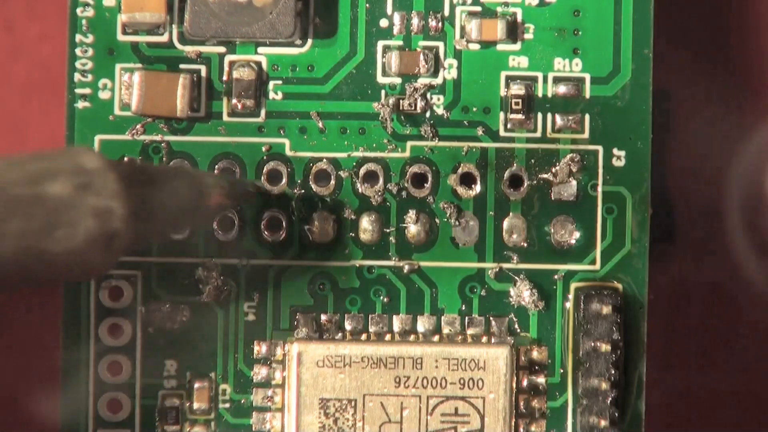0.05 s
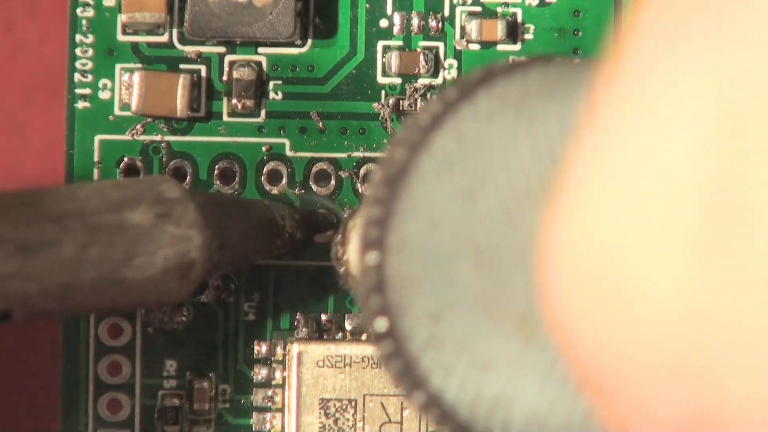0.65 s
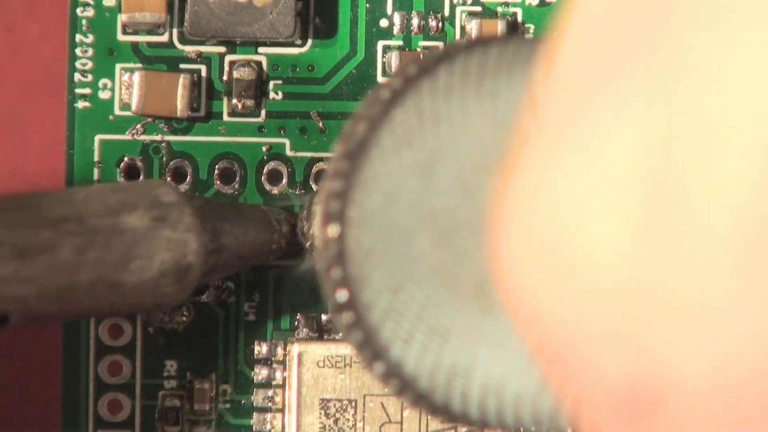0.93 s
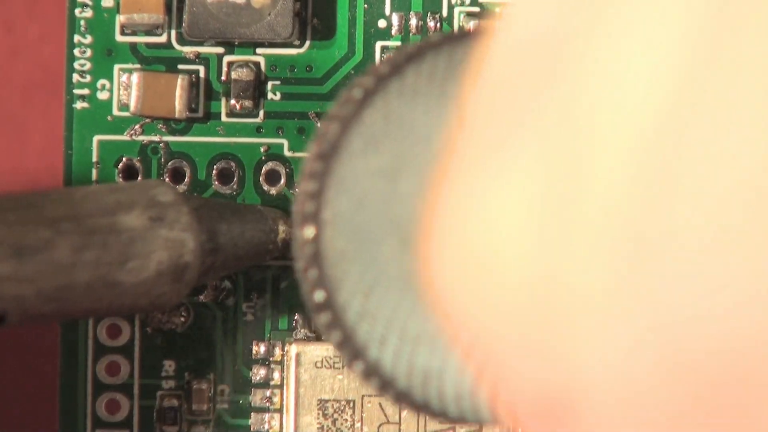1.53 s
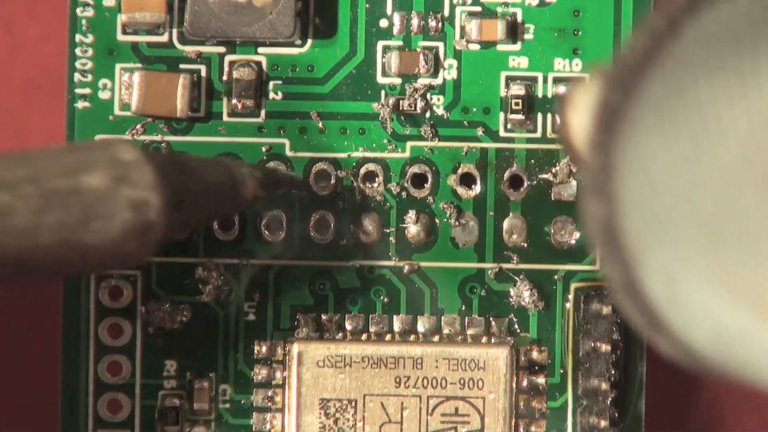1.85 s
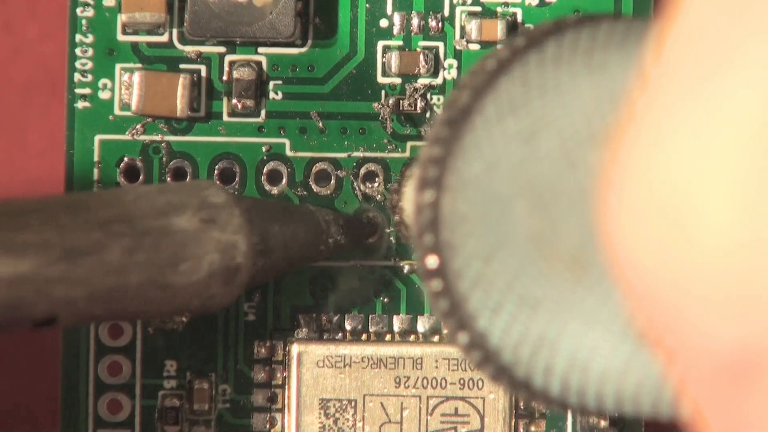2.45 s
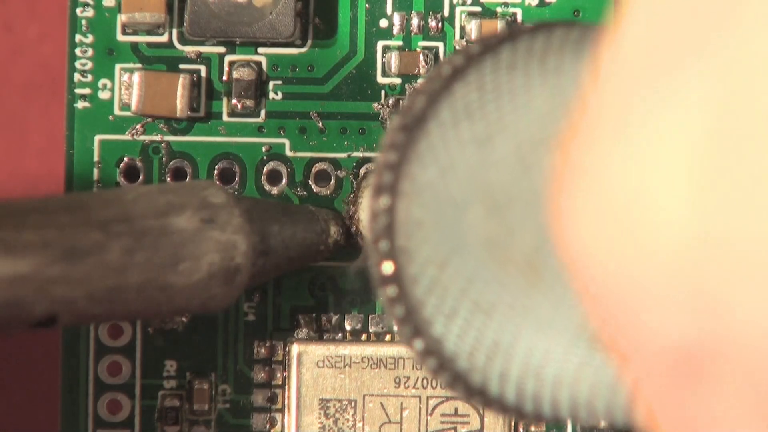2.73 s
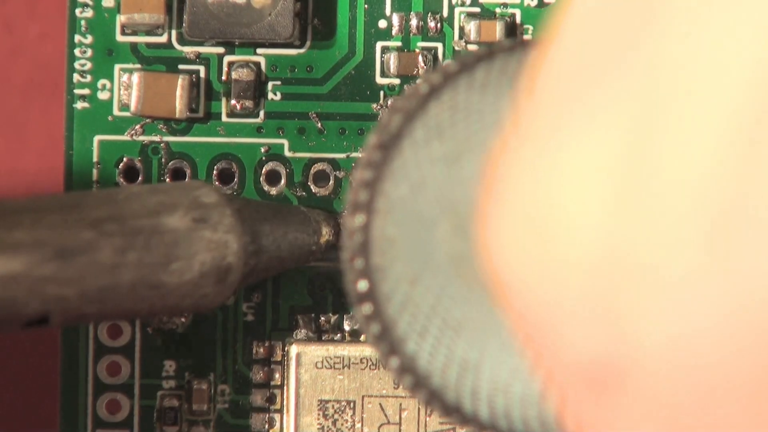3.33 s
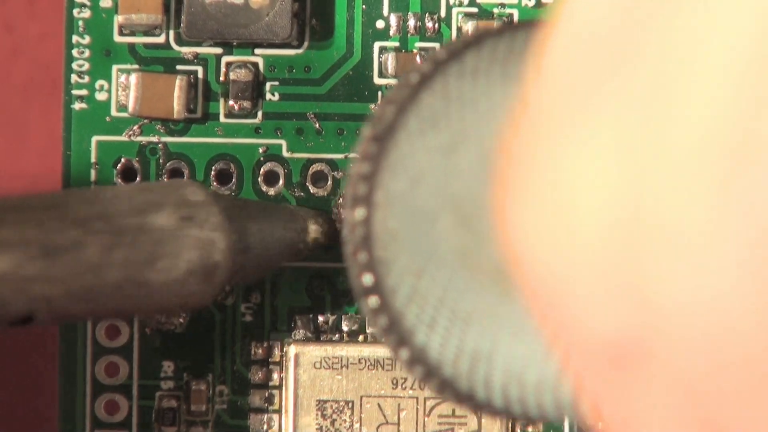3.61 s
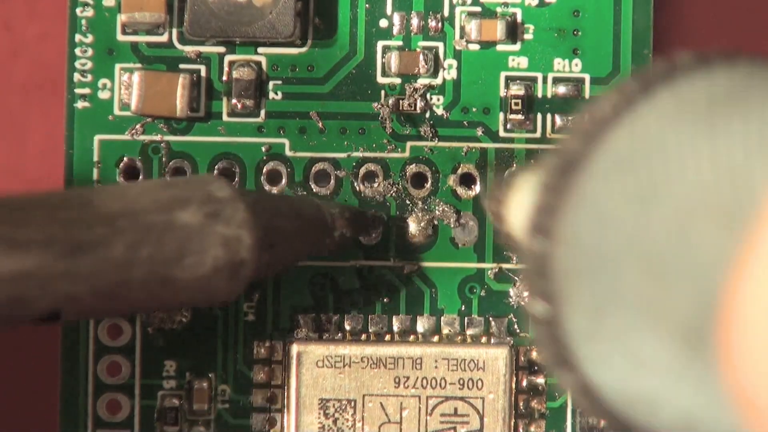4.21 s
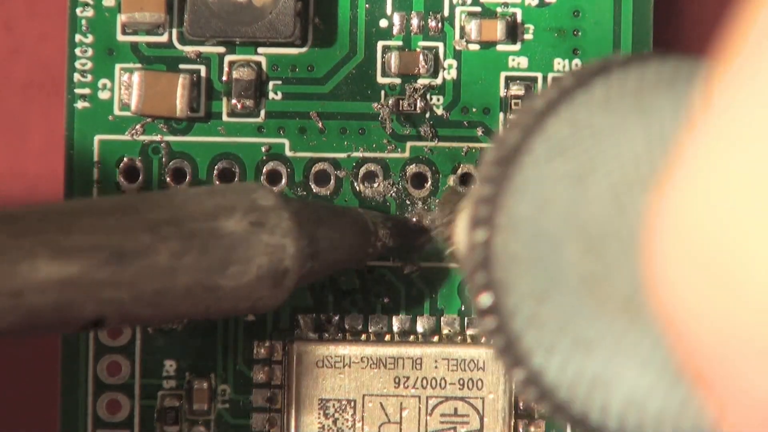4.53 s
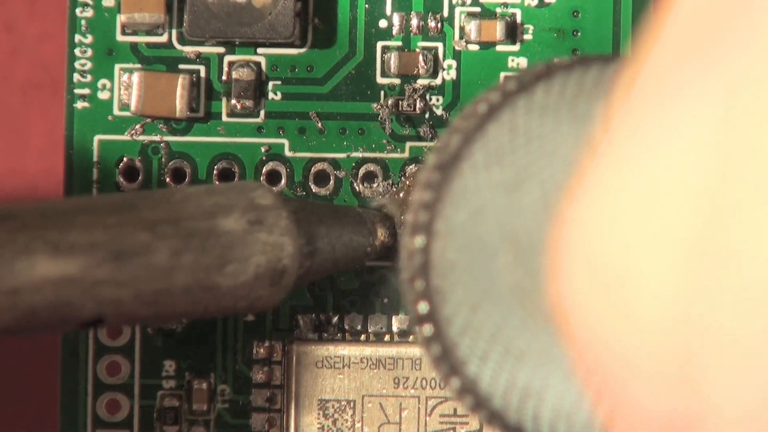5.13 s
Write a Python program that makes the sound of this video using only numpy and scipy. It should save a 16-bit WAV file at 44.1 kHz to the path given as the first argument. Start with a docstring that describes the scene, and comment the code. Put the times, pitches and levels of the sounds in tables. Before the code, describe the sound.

Close squeaks and latching clacks of a desoldering pump being cocked alternate with two loud snaps, with light circuit board taps and steady hum.

```python
"""At a workbench, over mains hum, a spring-loaded desoldering pump is worked close to the microphone.
As it is cocked, the piston seal squeals by stick-slip friction, the catch latches and the rod springs back.
Fired, the piston slams home with a gulp of air and the recoil thumps the bench. Each impact is an impulse
filtered by the body it strikes. The nozzle taps and scrapes a circuit board; faint ticks come in runs."""
import sys
import numpy as np
from scipy import signal
from scipy.fft import rfft, irfft
from scipy.io import wavfile
from scipy.ndimage import uniform_filter1d

SR = 44100
rng = np.random.default_rng(int(sys.argv[2]) if len(sys.argv) > 2 else 0)


def master(y):
    """Save y as 16-bit WAV."""
    cut = np.clip(np.atleast_2d(y).T, -1, 1)
    pcm = np.round(cut * 32767)  # scale
    wavfile.write(sys.argv[1], SR, pcm.astype(np.int16))


N = 236743
T = np.arange(N) / SR
MAINS_HZ = 50.06

# Spectral envelopes. Each row: frequency in Hz, relative level in dB.
HISS_COLOUR = [(150, -14), (300, -7), (550, -8.5), (900, -10), (1400, -12), (1900, -10.5), (2600, -14.5),
               (5000, -19), (10000, -24), (12000, -21)]
RUMBLE_COLOUR = [(20, 9.5), (45, -39), (70, -4), (125, 5.5), (200, 5.5), (300, 7), (500, -7), (900, -7),
                 (2500, -66)]
SLIDE_COLOUR = [(500, -7.5), (1400, -3), (2400, -1.5), (3600, 3.5), (4700, -9.5), (6000, -2.5), (7800, -7),
                (10500, -13.5), (15000, -26)]
RASP_COLOUR = [(900, -24), (2500, -10.5), (3600, 6.5), (4700, 0.5), (5900, 8), (7500, -3), (10000, -11.5),
               (15000, -23)]
CATCH_COLOUR = [(120, -55), (400, -33), (900, -45), (1700, -35), (2150, -12), (2650, -1), (3200, -5),
                (3800, 1), (4250, -2.5), (5000, -2.5), (5700, -16), (7700, -7), (9300, -14.5), (12000, -18),
                (15000, -36)]
TICK_COLOUR = [(1500, 4), (4000, 2.5), (6000, 3.5), (9000, 5), (12500, 0.5), (15000, -5)]
BUTTON_COLOUR = [(500, -27), (1400, -13), (2400, -4), (3100, -3.5), (3800, -6), (4300, -2.5), (5050, 4),
                 (5700, -1.5), (7000, -11), (10000, -18.5), (15000, -21)]
ROD_COLOUR = [(200, -24), (400, -17), (1000, -22), (1700, -19), (2600, -9), (3700, -5), (4900, -6),
              (5900, -1), (7100, -4.5), (8000, -10), (9200, -10), (10700, -21.5), (13500, -17),
              (15000, -30)]
TAP_COLOUR = [(150, -35), (500, -16), (1100, -8.5), (1350, -13), (1600, -3), (1950, -10.5), (2300, 3.5),
              (2600, 3.5), (2900, -5), (3300, -6), (4200, -18), (6200, -23), (8700, -13), (11000, -26),
              (12300, -15), (14000, -46)]
SLAM_COLOUR = [(120, -104.5), (200, -14.5), (338, -2.5), (624, -14), (1070, -6.5), (1510, -12.5),
               (1720, -10.5), (2130, -13), (2290, -7), (2550, -3), (3350, -7), (5070, 2), (9050, -6),
               (12300, -5.5), (15000, -12)]
WALL_COLOUR = [(100, -17), (400, 0), (1200, 7), (3000, 6.5), (7000, 3.5), (15000, 7.5)]

# Normal modes. Each row: frequency in Hz, bandwidth in Hz, relative level in dB.
BARREL_MODES = [(2590, 80, -2), (2950, 100, -5), (3770, 90, 1), (4350, 160, -7), (4980, 170, -7),
                (5260, 130, -6), (5750, 180, -9), (6980, 140, -3), (12200, 400, -6)]
BENCH_MODES = [(126, 3.8, 5), (140.6, 3.3, -7), (310, 27, -4), (391, 18, 3.5), (497, 32, 1.5),
               (747, 260, -2)]
BOARD_MODES = [(440, 70, -5), (694, 70, -5), (1030, 70, -1), (1310, 150, -2), (2250, 150, -2),
               (2850, 300, -9), (4620, 500, -15), (10500, 1600, -23)]
CREAK_MODES = [(424, 200, 0)]

# Harmonic series. Each row: harmonic number, level in dB.
HUM_HARMONICS = [(1, -62), (2, -49.5), (3, -45), (4, -61), (5, -60), (6, -49), (7, -67), (8, -65),
                 (9, -65.5), (10, -64.5), (11, -62), (13, -70.5), (14, -63.5), (16, -68.5), (22, -69.5)]
SEAL_OVERTONES = [(2, -3), (3, -2), (4, -26), (5, -23), (6, -13), (7, -11)]

# Cocking strokes. Each row: squeal start and length in seconds, pitch in Hz, levels of squeal, overtones
# and rasp in dB, chirp length in seconds, its level in dB, slide hold in seconds, its level in dB.
STROKES = [(0.044, 0.0299, 1131, -18.5, -9.5, -5.5, .008, -32, 0.14, -35),
           (1.942, 0.015, 1090, -25, -6, -9.5, .02, -38, 0.16, -34),
           (3.971, 0.028, 1065, -21.5, -4, -18, 0.011, -39, 0.15, -33)]
# The two harder strokes jump to a higher register, one path each.
# Each row of a path: time in seconds, pitch in Hz, relative level in dB.
HIGH_SQUEALS = [
    [(0.072, 1544, -16.5), (0.084, 1458, -24), (0.118, 1450, -40)],
    [(3.998, 1394, -17), (4.01, 1363, -24.5), (4.028, 1443, -34), (4.034, 1380, -34), (4.044, 1512, -32),
     (4.068, 1680, -23.5), (4.084, 1693, -28.5)],
]

# Events. Each row: start in seconds, relative level in dB.
CATCH_GRAZES = [(.1355, -24), (0.1422, -18), (0.155, -19.5), (.1625, -24), (.18, -26), (2.0265, -19)]
CATCH_LATCHES = [(2.0386, 1), (4.0867, -2)]
TICK_RUNS = [(0.2536, -47.5), (1.5917, -47.5), (2.9306, -47), (4.349, -48.5)]
BUTTON_PRESSES = [(.259, -26), (1.4157, -25.5), (3.476, -17.5)]
BUTTON_RELEASES = [(1.5888, -15), (3.6404, -16.5)]
ROD_RETURNS = [(.3013, -1), (2.1758, -2), (4.2358, -0.5)]
BOARD_CREAKS = [(3.165, -14.5)]
# The pump fires. Each row: start in seconds, relative level in dB, hardness as a factor on the cut-off.
SHOTS = [(1.44, 0, 1.12), (3.4971, 0.5, 0.78)]

# Contacts within one event.
# Each row: delay in seconds, relative level in dB, chatter T60 in seconds, nominal cut-off in Hz.
LATCH_CONTACTS = [(0, -1, 0.0071, 16500), (.0013, -5, 0.053, 15400), (0.029, -13, .055, 9000)]
RELEASE_CONTACTS = [(0, 0.5, 0.021, 15000), (.0085, 2, 0.012, 9600)]
ROD_CONTACTS = [(0, -3.5, .045, 10500), (.0067, -1.5, .016, 12500), (.0087, -7, .028, 18000)]
SLAM_CONTACTS = [(0, 1, .01, 7800), (.0065, -3.5, 0.016, 16500), (.009, -6, .035, 16500),
                 (.021, -10, .016, 9000)]
# Pushes on the bench. Each row: delay in seconds, relative level in dB, duration in seconds.
SHOT_RECOIL = [(.0115, -8, 0.0015), (0.0174, 4.5, 0.0041), (.052, -9, .0052)]
ROD_RECOIL = [(0.0111, -19.5, 0.00087)]

# The nozzle strikes the board. Each row: start in seconds, relative level in dB, cut-off in Hz.
TAPS = [(.508, -32.5, 6000), (0.8111, -15, 16000), (1.4641, -7, 6000), (3.528, -13.5, 8920),
        (3.537, -23, 8850), (4.4375, -32, 6030)]
# It is dragged. Each row: peak time in seconds, level in dB, then attack, hold and release in seconds.
SCRAPES = [(3.168, -44, 0.028, 0.078, 0.19), (4.632, -54.5, 0.31, 0.38, 1)]


def undb(db):
    """Amplitude ratio of a level in decibels."""
    return 10 ** (np.asarray(db) / 20)


def unit(x):
    """Normalisation to an rms of 1."""
    return x / np.sqrt(np.mean(x ** 2))


def add(out, s, x):
    """Superposition: x joins out at s seconds."""
    i = int(s * SR)
    out[i:i + len(x)] += x[:N - i]


def convolve(x, response):
    """A linear system convolves its input with its impulse response."""
    return signal.fftconvolve(x, response)[:N]


def colour(points, size=2048):
    """Minimum-phase impulse response of unit energy, found from a spectral envelope by its cepstrum."""
    hz, db = np.transpose(points)
    bins_hz = np.maximum(np.arange(size // 2 + 1) * SR / size, 1)
    magnitude = undb(np.interp(np.log(bins_hz), np.log(hz), db))
    cepstrum = irfft(np.log(magnitude))
    cepstrum[1:size // 2] *= 2
    cepstrum[size // 2 + 1:] = 0
    response = irfft(np.exp(rfft(cepstrum)))
    return response / np.linalg.norm(response)


def ring(modes):
    """Modal superposition: damped sinusoids sum to an impulse response, scaled to unit energy."""
    t = T[:SR // 2]
    response = sum(undb(db) * width * np.exp(-np.pi * width * t) * np.sin(2 * np.pi * hz * t)
                   for hz, width, db in modes)
    return response / np.linalg.norm(response)


def grit(spread_db, slip_samples=24):
    """Friction noise: its strength jumps from one tiny slip to the next."""
    slips = np.repeat(rng.standard_normal(N // slip_samples + 1), slip_samples)[:N]
    return unit(undb(spread_db * slips) * rng.standard_normal(N))


def swell(s, db, attack_s, hold_s, sag_db, release_s, depth_db=28):
    """Piecewise exponential envelope: it peaks at s seconds, sags while held, then dies away."""
    times = s + np.array([-attack_s, 0, hold_s, hold_s + release_s])
    levels = db - np.array([depth_db, 0, sag_db, sag_db + depth_db])
    return undb(np.interp(T, times, levels, left=-np.inf, right=-np.inf))


def each(events, pattern):
    """A pattern of contacts repeats at every event; delays and decibels add."""
    return [(s + delay, db + part_db, *rest) for s, db, *_ in events for delay, part_db, *rest in pattern]


def knocks(contacts, envelope, chatter_db, gain_db=10.5, size=4096):
    """Impact excitation: an impulse and decaying chatter, low-passed more by a softer contact."""
    blows = np.zeros(N)
    for s, db, t60, cut_hz in contacts:
        chatter = rng.standard_normal(size) * np.exp(-np.log(1000) * T[:size] / t60)
        force = undb(chatter_db) * chatter / np.linalg.norm(chatter)
        force[0] = 1
        softness = signal.butter(2, cut_hz, fs=SR)
        add(blows, s, undb(db + gain_db) * signal.lfilter(*softness, force / np.linalg.norm(force)))
    return convolve(blows, colour(envelope))


def stereo(mid, side, band_hz=(210, 12500)):
    """Sum and difference give left and right; the bass and the very top stay central."""
    band = signal.butter(4, band_hz, "band", fs=SR, output="sos")
    return mid + signal.sosfilt(band, side) * np.array([[1], [-1]])


def background():
    """Mains hum is a harmonic series, heard over broadband room rumble and hiss."""
    phases = rng.uniform(0, 2 * np.pi, len(HUM_HARMONICS))
    hum = sum(np.sqrt(2) * undb(db) * np.sin(2 * np.pi * k * MAINS_HZ * T + phase)
              for (k, db), phase in zip(HUM_HARMONICS, phases))
    rumble = undb(-54.5) * convolve(rng.standard_normal(N), colour(RUMBLE_COLOUR))
    mid, side = (undb(db) * convolve(rng.standard_normal(N), colour(HISS_COLOUR)) for db in (-53.5, -55.5))
    return stereo(hum + rumble + mid, side)


def squeal_paths(chirp_from_hz=1970, chirp_to_hz=1760, sag_hz_per_s=210):
    """Regimes of stick-slip: chirp, held squeal, high register. Each yields path, overtone dB, rasp dB."""
    for s, length, hz, db, overtone_db, rasp_db, chirp_s, chirp_db, _, _ in STROKES:
        yield [(s - chirp_s, chirp_from_hz, chirp_db), (s + 0.0033, chirp_to_hz, chirp_db)], -33, -5.5
        yield [(s, hz, db), (s + length, hz - sag_hz_per_s * length, db)], overtone_db, rasp_db
    for path in HIGH_SQUEALS:
        yield [(s, hz, db + 1) for s, hz, db in path], -18, -20


def seal(edge_s=0.0023, jitter=0.02, flutter_db=2.2, lowest_hz=800):
    """Stick-slip oscillation: the rubber seal squeals, rasping once a cycle, over its sliding hiss."""
    tone, rasp = np.zeros(N), np.zeros(N)
    waver, pressure = (unit(uniform_filter1d(rng.standard_normal(N), 40)) for _ in range(2))
    friction = grit(spread_db=4.5)
    for path, overtone_db, rasp_db in squeal_paths():
        times, hz, db = np.transpose(path)
        s = times[0]
        t = T[:int((np.ptp(times) + edge_s) * SR)]
        here = int(s * SR) + np.arange(len(t))
        pitch_hz = np.interp(s + t, times, hz) * (1 + jitter * waver[here])
        phase = 2 * np.pi * np.cumsum(pitch_hz) / SR
        fade = np.clip(np.minimum(t, (t[-1] - t) / 2) / edge_s, 0, 1)
        grip = fade * undb(np.interp(s + t, times, db) + flutter_db * pressure[here])
        overtones = sum(undb(level) * np.sin(k * phase) for k, level in SEAL_OVERTONES)
        add(tone, s, np.sqrt(2) * grip * (np.sin(phase) + undb(overtone_db) * overtones))
        slipping = (1 + np.cos(phase)) ** 2 / 2
        add(rasp, s, grip * undb(rasp_db) * friction[here] * slipping)
    sliding = sum(swell(s, db, attack_s=0.052, hold_s=hold, sag_db=6, release_s=0.063)
                  for s, *_, hold, db in STROKES)
    slide = convolve(grit(spread_db=2, slip_samples=48), colour(SLIDE_COLOUR)) * sliding
    highpass = signal.butter(4, lowest_hz, "high", fs=SR, output="sos")
    return signal.sosfilt(highpass, tone + convolve(rasp, colour(RASP_COLOUR)) + slide)


def catch(graze_t60=0.011, graze_cut_hz=6400):
    """Impact and rebound: the catch grazes the rod, or snaps in, bounces once and settles."""
    grazes = [(s, db, graze_t60, graze_cut_hz) for s, db in CATCH_GRAZES]
    return knocks(each(CATCH_LATCHES, LATCH_CONTACTS) + grazes, CATCH_COLOUR, chatter_db=3)


def barrel(drive):
    """Resonance: the barrel adds the ringing of its modes to the sounds that drive it."""
    return drive + undb(-16) * convolve(drive, ring(BARREL_MODES))


def ticks(rise_s=0.0037, count=7, period_s=4 / MAINS_HZ):
    """Amplitude-modulated noise: a fizzy tick every fourth mains cycle, weaker as each run ends."""
    t = T[:SR // 20] / rise_s
    pulse = t * np.exp(1 - t)
    gate = np.zeros(N)
    for s, db in TICK_RUNS:
        for k in range(count):
            droop_db = 2.7 * (k / (count - 1)) ** 4
            add(gate, s + k * period_s, undb(db - droop_db) * pulse)
    return convolve(gate * rng.standard_normal(N), colour(TICK_COLOUR))


def button(press_t60=0.045, press_cut_hz=7400):
    """Contact transients: the release button clicks once going down and twice coming up."""
    presses = [(s, db, press_t60, press_cut_hz) for s, db in BUTTON_PRESSES]
    return knocks(each(BUTTON_RELEASES, RELEASE_CONTACTS) + presses, BUTTON_COLOUR, chatter_db=7.5)


def rod():
    """A spring's restoring force: the loose rod breaks free, hits its end stop and bounces, chattering."""
    return knocks(each(ROD_RETURNS, ROD_CONTACTS), ROD_COLOUR, chatter_db=13)


def bench(thump_db=11, lowest_hz=95):
    """Recoil passes through the hand into the bench; a longer push excites only the lowest modes."""
    force = np.zeros(N)
    for s, db, length in each(SHOTS, SHOT_RECOIL) + each(ROD_RETURNS, ROD_RECOIL):
        push = np.hanning(int(length * SR))
        add(force, s, undb(db + thump_db) * push / push.sum())
    radiation = signal.butter(2, lowest_hz, "high", fs=SR, output="sos")
    return signal.sosfilt(radiation, convolve(force, ring(BENCH_MODES)))


def nozzle(tap_t60=0.026, slip_count=3, slip_gap_s=0.007):
    """Impact and friction drive the board: the nozzle taps it, creaks loose in a few slips and scrapes."""
    slips = np.zeros(N)
    for s, db in BOARD_CREAKS:
        for k in range(slip_count):
            add(slips, s + k * slip_gap_s, undb([db]))
    creak = convolve(slips, ring(CREAK_MODES))
    drag = sum(swell(s, db, attack, hold, sag_db=1, release_s=release)
               for s, db, attack, hold, release in SCRAPES)
    scrape = convolve(grit(spread_db=1) * drag, ring(BOARD_MODES))
    taps = knocks([(s, db, tap_t60, cut_hz) for s, db, cut_hz in TAPS], TAP_COLOUR, chatter_db=11)
    return taps + creak + scrape


def gulp(lead_s=0.00067):
    """Suction: air rushes into the nozzle just ahead of the slam and dies away once the piston stops."""
    suction = sum(swell(s - lead_s, db - 12, attack_s=0.006, hold_s=0.011, sag_db=11.5, release_s=0.078)
                  for s, db, _ in SHOTS)
    return convolve(grit(spread_db=5), colour(SLAM_COLOUR)) * suction


def piston():
    """Collision: the piston hits its stop and rebounds; harder contact gives a wider spectrum."""
    contacts = [(s + delay, db + part_db, t60, hardness * cut_hz)
                for s, db, hardness in SHOTS for delay, part_db, t60, cut_hz in SLAM_CONTACTS]
    return knocks(contacts, SLAM_COLOUR, chatter_db=6)


def room(x, early_db=-7, early_t60=0.14, late_db=-26, late_t60=1.0, side_db=-5, onset_s=0.0021):
    """Reverberation: dense nearby reflections and a small room's faint tail decay exponentially."""
    t = T[:SR // 2]
    decay = sum(undb(db) * np.exp(-np.log(1000) * t / t60) * np.sqrt(2 * np.log(1000) / (t60 * SR))
                for db, t60 in ((early_db, early_t60), (late_db, late_t60)))
    decay *= np.clip(t / onset_s, 0, 1)
    walls = colour(WALL_COLOUR)
    mid, side = (np.convolve(decay * rng.standard_normal(len(t)), walls) for _ in range(2))
    return stereo(convolve(x, mid), undb(side_db) * convolve(x, side))


def scene():
    """Direct sound, slightly to the right, adds to its reflections; the nearest source is the driest."""
    pump = barrel(piston() + rod() + catch() + button() + gulp()) + seal()
    surfaces = bench() + nozzle()
    fizz = ticks()
    direct = (pump + surfaces + fizz) * undb([[-0.3], [0.3]])
    reflected = room(pump + undb(-4) * surfaces + undb(3) * fizz)
    return direct + reflected + background()


def record(dry, ceiling=0.9, top_hz=14900):
    """Soft saturation rounds the tallest peaks; a steep low-pass limits the bandwidth."""
    rounded = dry / (1 + (dry / ceiling) ** 8) ** (1 / 8)
    return signal.sosfilt(signal.ellip(10, 0.2, 70, top_hz, fs=SR, output="sos"), rounded)


dry = scene()
out = record(dry)
master(out)
```